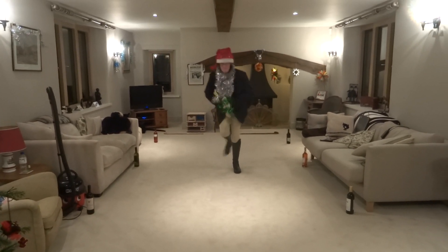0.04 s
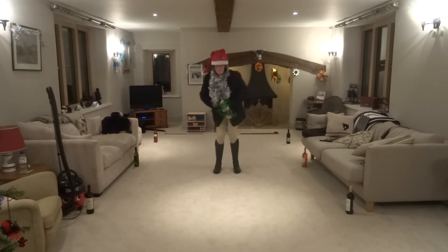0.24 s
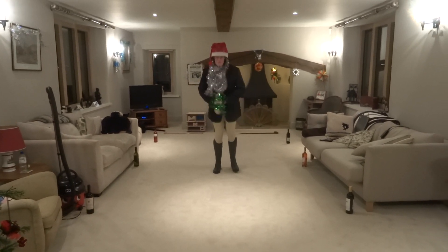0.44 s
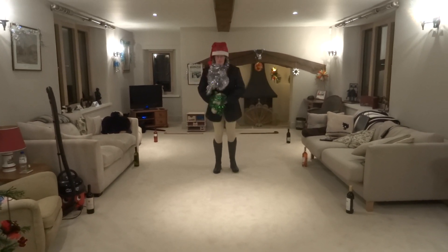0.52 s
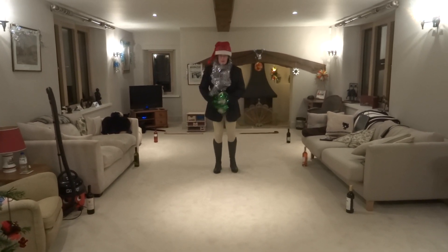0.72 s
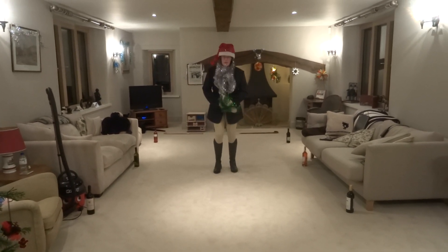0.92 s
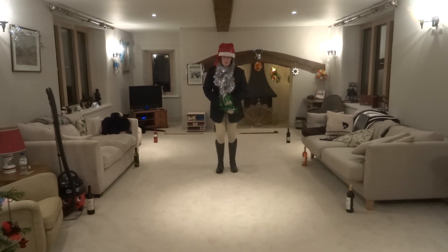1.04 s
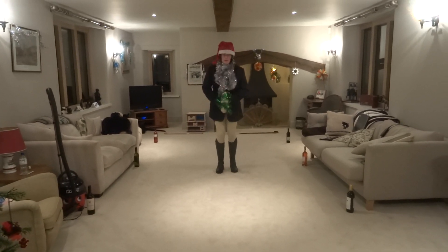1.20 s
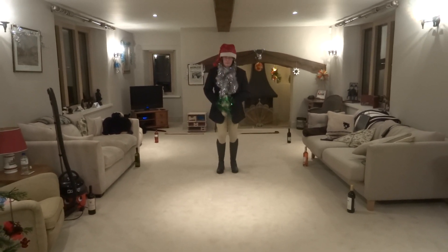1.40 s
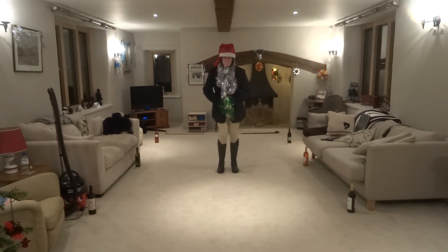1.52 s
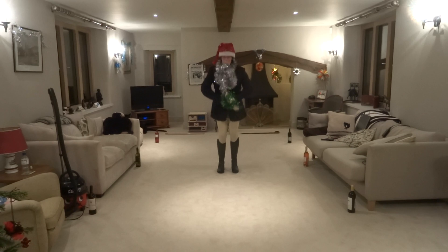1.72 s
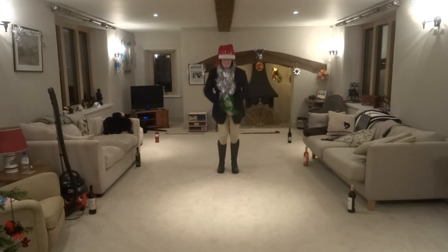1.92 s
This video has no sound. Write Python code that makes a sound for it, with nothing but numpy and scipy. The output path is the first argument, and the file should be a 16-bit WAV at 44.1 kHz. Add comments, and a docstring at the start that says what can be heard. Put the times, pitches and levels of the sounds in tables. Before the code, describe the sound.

One dull boot thud on carpet in a living room, then soft shifts of weight.

```python
"""A carpeted living room, where a rubber boot stamps once, a few metres from the microphone.
The heel knocks and the sole slaps down just after it; the walls echo, and floor and room ring
and die away. Soft thumps follow as the weight shifts on the floorboards. The rubber gives two
tiny squeaks as it bends, and clothes rustle faintly over a constant hiss and hum."""
import sys
import numpy as np
from scipy import signal
from scipy.fft import rfft, irfft
from scipy.io import wavfile

SR = 44100
rng = np.random.default_rng(int(sys.argv[2]) if len(sys.argv) > 2 else 0)


def generate_wav(sig):
    """Save sig (samples, or channels by samples) to the path in sys.argv[1] as 16-bit PCM at SR."""
    pcm = np.round(np.clip(np.atleast_2d(sig).T, -1, 1) * 32767).astype(np.int16)
    wavfile.write(sys.argv[1], SR, pcm)


N = 85995

# heel, then sole, hitting the floor (t60 is the time a sound takes to fade by 60 dB):
# t/s, overall level/dB, knock f/Hz, knock t60/s, relative thump level/dB, relative click level/dB
CONTACTS = [(0.2251, -14.5, 894.6, 0.038, -31, -15.5), (0.2331, -17, 805, 0.025, 3, -14.5)]


def undb(db):
    """Turn decibels into a factor to multiply by."""
    return 10 ** (np.asarray(db) / 20)


def unit(x):
    """Scale a signal to an average (rms) level of 1."""
    return x / np.sqrt(np.mean(x ** 2))


def age(start):
    """Seconds since start, zero before it."""
    return np.maximum(np.arange(N) / SR - start, 0)


def fade(start, rise, t60):
    """A loudness curve that builds up and dies away; all times in seconds."""
    return (1 - np.exp(-age(start) / rise)) * np.exp(-np.log(1000) * age(start) / t60)


def ring(start, hz, t60):
    """A pure tone that dies away, as when something is struck."""
    return np.sin(2 * np.pi * hz * age(start)) * np.exp(-np.log(1000) * age(start) / t60)


def cut(x, hz, kind="lowpass", order=2):
    """Turn down what lies above hz (below it for "highpass"); a higher order cuts more steeply."""
    return signal.sosfilt(signal.butter(order, hz, kind, fs=SR, output="sos"), x)


def freqs():
    """The frequency in Hz of each point of the spectrum."""
    return np.maximum(np.fft.rfftfreq(N, 1 / SR), 1)


def colour(points):
    """Join (f/Hz, level/dB) points into a gain for every frequency."""
    hz, db = np.array(points).T
    return undb(np.interp(np.log(freqs()), np.log(hz), db))


def noise(gain, width=0.37, wide_from_hz=390, wide_to_hz=7450):
    """Stereo noise of level 1, shaped by gain; width sets how much the ears differ, least in the bass."""
    mid, side = rfft(rng.standard_normal((2, N))) * gain
    side = side * width * freqs() / np.hypot(freqs(), wide_from_hz) / np.hypot(1, freqs() / wide_to_hz)
    return unit(irfft(np.array([mid + side, mid - side]), N))


def background(level_db=-58, low_hz=450, treble_hz=3800, peak_db=-73.5, peak_hz=10340, peak_width_hz=1020):
    """Steady low room noise under a hiss with one high peak; its middle and treble drift in level."""
    # tone colour of the noise: f/Hz, relative level/dB
    spectrum = [(20, 0), (45, -15), (75, -9.5), (130, -9.5), (200, -11), (280, -4.5), (400, -5.5),
                (600, -11), (1200, -12.5), (2000, -17), (3000, -17.5), (4000, -24), (5200, -20.5),
                (8500, -23), (11500, -21.5), (13000, -29.5), (15500, -31.5)]
    # drift of the hiss: t/s, middle gain/dB, treble gain/dB
    drift = [(0, 6.5, 9.5), (0.12, 2.5, 5), (0.4, 7.5, 2), (0.58, 2.5, -1), (0.95, 1.5, 0), (1.15, -1, -2),
             (1.3, 0, -4), (1.38, 3.5, -5.5), (1.62, 4.5, 1), (1.801, 4, 2.5), (1.95, -5, -4)]
    times, middle_db, treble_db = np.array(drift).T
    middle_gain, treble_gain = (undb(np.interp(age(0), times, db)) for db in (middle_db, treble_db))
    air = rfft(undb(level_db) * noise(colour(spectrum)))
    low = 1 / (1 + (freqs() / low_hz) ** 4)
    high = 1 / (1 + (treble_hz / freqs()) ** 4)
    bass, middle, treble = (irfft(air * share, N) for share in (low, 1 - low - high, high))
    peak = undb(peak_db) * noise(1 / (1 + (2 * (freqs() - peak_hz) / peak_width_hz) ** 2))
    return bass + middle_gain * middle + treble_gain * (treble + peak)


def hum(width_hz=6.5):
    """The room hums faintly: very narrow bands of noise sound like wavering tones."""
    # tones of the hum: f/Hz, level/dB
    tones = [(163, -69.5), (240, -72.5), (292, -67.5), (1028, -73)]
    return sum(undb(db) * noise(np.exp(-((freqs() - hz) / width_hz) ** 2)) for hz, db in tones)


def squeaks(width_hz=20, swell_s=0.016):
    """The rubber chirps faintly as it bends."""
    # squeaks at their loudest: t/s, level/dB, f/Hz
    chirps = [(0.168, -56.5, 1218), (1.66, -60.5, 2610)]
    out = 0
    for when, db, hz in chirps:
        tone = noise(np.exp(-((freqs() - hz) / width_hz) ** 2))
        swell = np.exp(-((age(0) - when) / swell_s) ** 2)
        out += undb(db) * tone * swell
    return out


def boot(carpet_hz=2240):
    """Heel and sole each knock, shake the boot's rubber shaft, thump the floor and click a little."""
    out = 0
    for start, db, hz, t60, thump_db, click_db in CONTACTS:
        knock = ring(start, hz, t60)
        shaft = undb(-5) * ring(start, hz=1384, t60=0.013)
        thump = undb(thump_db) * ring(start, hz=288, t60=0.043)
        blow = cut(knock + shaft + thump, carpet_hz, order=3)  # the carpet softens it
        click = unit(cut(rng.standard_normal(N), hz=3770)) * fade(start, rise=0.00039, t60=0.015)
        out += undb(db) * (blow + undb(click_db) * cut(click, hz=5900, order=8))
    return cut(out, hz=112, kind="highpass", order=1)


def reverberation(rise_s=0.0033, tail_top_hz=350):
    """Countless echoes blur into noise; each band fades at its own speed, and the bass lingers."""
    # how the room dies away: f/Hz, band level/dB, t60/s
    decays = [(68.6, -42, 0.99), (108, -31.5, 0.47), (173, -28.5, 0.34), (350, -29.5, 0.68),
              (570, -31.5, 0.66), (816, -23.5, 0.33), (1460, -34.5, 0.43), (2060, -47, 0.31),
              (3160, -48, 0.46), (6000, -65.5, 0.35), (12000, -75, 0.63)]
    hz, db, t60 = np.array(decays).T
    start, out = CONTACTS[0][0], 0
    tail = undb(-21) * fade(start, rise_s, t60=3.32)
    for centre in 64 * 2 ** (np.arange(16) / 2):  # Hz, half an octave apart
        bands_away = np.abs(2 * np.log2(freqs() / centre))
        band = noise(np.sqrt(np.maximum(1 - bands_away, 0)), width=0.14)
        band_db, band_t60 = (np.interp(np.log(centre), np.log(hz), column) for column in (db, t60))
        early = fade(start, rise_s, band_t60)
        late = tail / np.hypot(1, (centre / tail_top_hz) ** 2)
        out += undb(band_db) * band * np.hypot(early, late)
    return out


def reflections(direct):
    """Walls and ceiling send back dull copies of the stamp."""
    # first echoes: delay/s, gain/dB
    echoes = [(.0056, -11), (.0157, -10), (.0188, -31), (.0296, -15), (0.0383, -18), (0.0551, -30)]
    t, dull = age(0), cut(direct, hz=2230)
    return sum(undb(db) * np.interp(t - delay, t, dull) for delay, db in echoes)


def room_ringing(rise_s=0.019):
    """Floor and room ring at their own pitches once the sole is down."""
    # natural tones of floor and room: f/Hz, level/dB, t60/s
    tones = [(37.7, -42.5, 1.7), (71.8, -25.5, 0.41), (79.5, -26.5, 0.48), (118.9, -33.5, 0.66),
             (170.6, -36.5, 0.63), (200.5, -25, .42), (244.3, -43, 0.54), (299.6, -27.5, 0.43),
             (318.3, -24, 0.42), (363, -20, 0.31), (485.6, -25, .42), (751, -34.5, 0.6), (782, -29.5, 0.49),
             (835, -33, 0.46)]
    start = CONTACTS[1][0]
    swell = 1 - np.exp(-age(start) / rise_s)
    return swell * sum(undb(db) * ring(start, hz, t60) for hz, db, t60 in tones)


def clothes():
    """Cloth rustles after the jolt and as the body moves again."""
    # rustles: t/s, level/dB, rise/s, t60/s
    rustles = [(0.24, -41, 0.065, 0.87), (1.853, -47.5, 0.01, 3.1)]
    # tone colour of the cloth: f/Hz, relative level/dB
    spectrum = [(30, -14), (70, 7), (200, -4), (450, -3.5), (1200, -12.5), (3000, -16), (4200, -21),
                (8500, -22.5), (10600, -14), (12500, -29), (15000, -41)]
    return sum(undb(db) * noise(colour(spectrum)) * fade(start, rise, t60)
               for start, db, rise, t60 in rustles)


def creases(width_octaves=0.93):
    """Boot and coat crease after the blow, with short brushing sounds."""
    # brushes of rubber and cloth: t/s, level/dB, centre f/Hz
    brushes = [(0.25, -43.5, 4220), (0.274, -41, 3720), (0.324, -54, 2780), (0.421, -41, 1420),
               (0.448, -41.5, 1300), (1.345, -51, 1560)]
    out = 0
    for start, db, hz in brushes:
        brush = noise(np.exp(-(np.log2(freqs() / hz) / width_octaves) ** 2))
        out += undb(db) * brush * fade(start, rise=0.0064, t60=0.069)
    return out


def weight_shifts(rise_s=0.0056):
    """The feet press softly on the carpet: the boards boom, the sole knocks and scuffs."""
    # soft thumps: t/s, boom level/dB, knock level/dB, knock f/Hz, scuff level/dB
    shifts = [(0.611, -38.5, -42.5, 164.3, -58.5), (0.727, -58, -48, 340, -58), (0.851, -45, -48, 141, -57),
              (1.402, -50.5, -55.5, 143, -57.5), (1.806, -42, -38.5, 135.7, -45)]
    # tone colour of a scuff: f/Hz, relative level/dB
    spectrum = [(40, -18), (100, 4), (450, -3.5), (900, -11.5), (2000, -32), (8000, -28), (16000, -80)]
    out = 0
    for start, boom_db, knock_db, hz, scuff_db in shifts:
        boom = undb(boom_db) * ring(start, hz=70, t60=0.32)
        knock = undb(knock_db) * ring(start, hz, t60=0.24)
        scuff = undb(scuff_db) * noise(colour(spectrum)) * fade(start, rise_s, t60=0.41)
        swell = 1 - np.exp(-age(start) / rise_s)
        out += (boom + knock) * swell + scuff
    return out


def scene():
    """The stamp in its room and the small movements around it, over hiss and hum."""
    direct = boot()
    stamp = direct + reflections(direct) + room_ringing() + reverberation()
    return stamp + weight_shifts() + clothes() + creases() + squeaks() + background() + hum()


def record(dry, right_db=1.0, tilt_hz=1400, top_hz=15700):
    """The right microphone is a little brighter than the left; the highest treble is cut off."""
    tilt_db = right_db * freqs() ** 2 / (freqs() ** 2 + tilt_hz ** 2)
    heard = irfft(rfft(dry) * undb(np.array([-tilt_db, tilt_db]) / 2), N)
    return signal.sosfilt(signal.ellip(10, .2, 80, top_hz, fs=SR, output="sos"), heard)


dry = scene()
out = record(dry)
generate_wav(out)
```